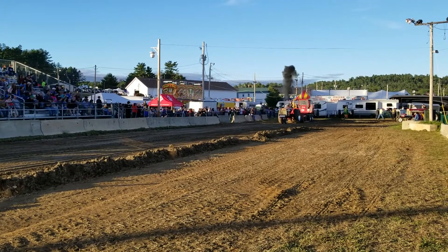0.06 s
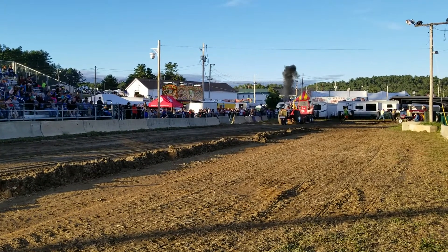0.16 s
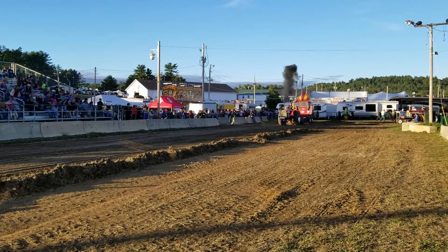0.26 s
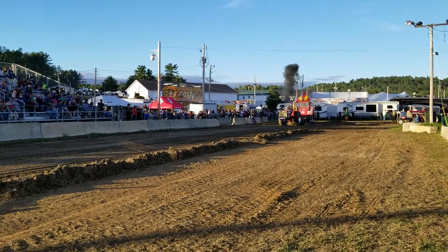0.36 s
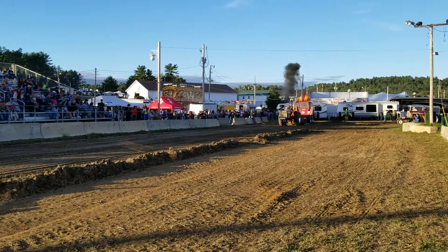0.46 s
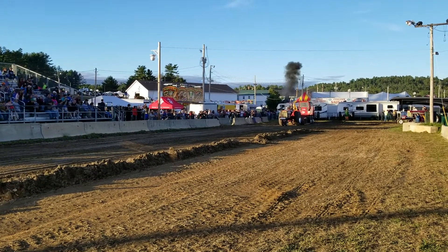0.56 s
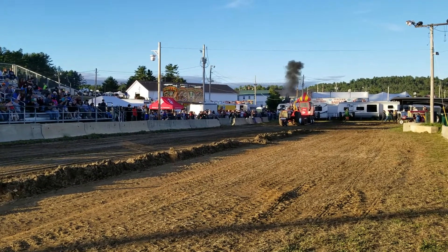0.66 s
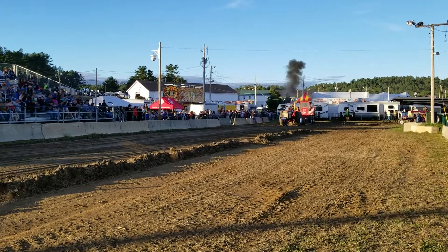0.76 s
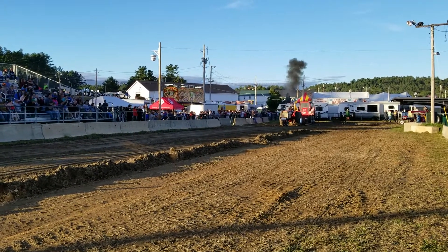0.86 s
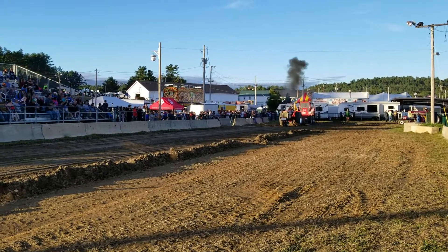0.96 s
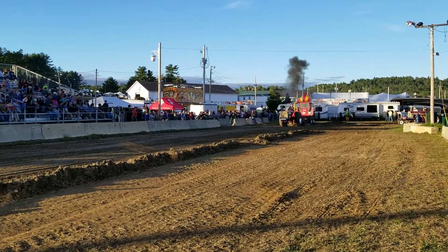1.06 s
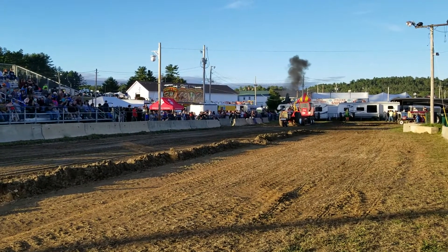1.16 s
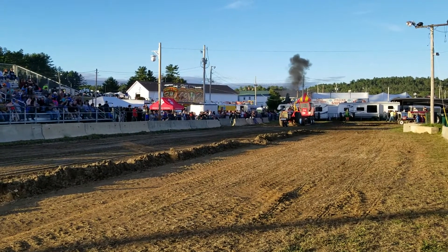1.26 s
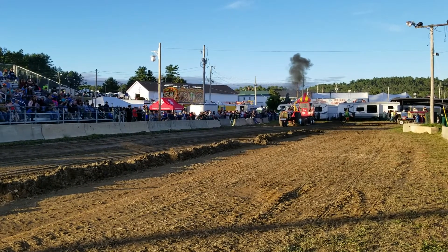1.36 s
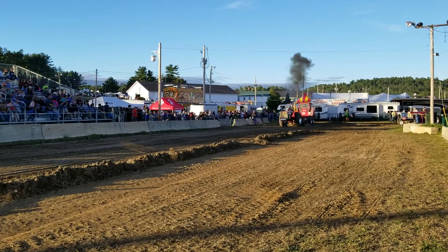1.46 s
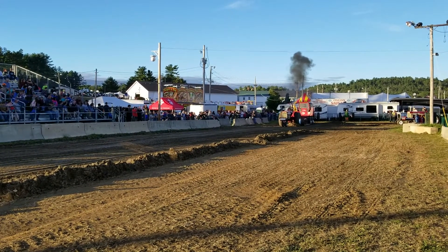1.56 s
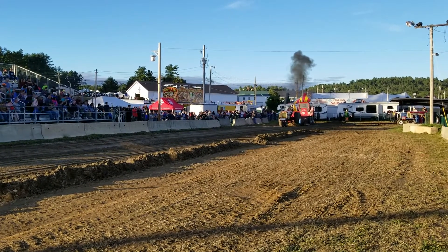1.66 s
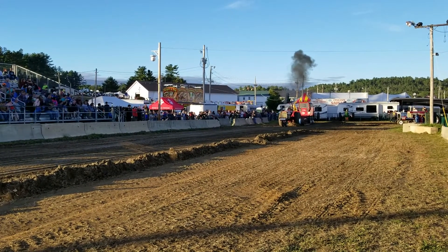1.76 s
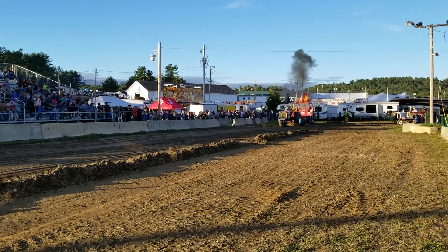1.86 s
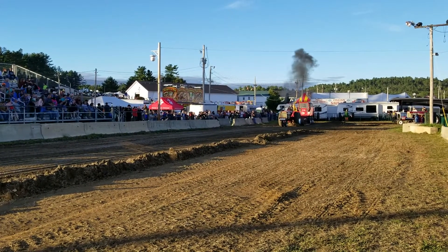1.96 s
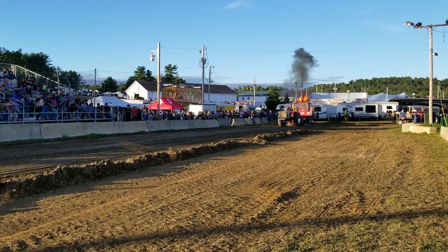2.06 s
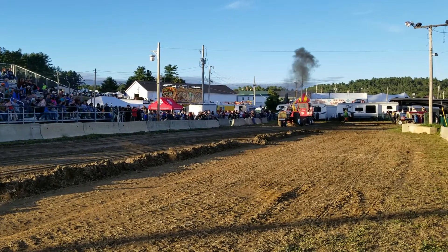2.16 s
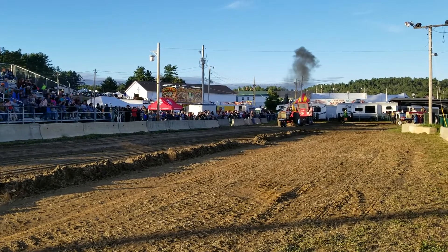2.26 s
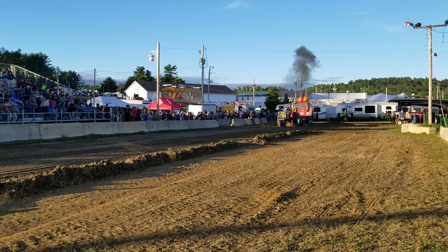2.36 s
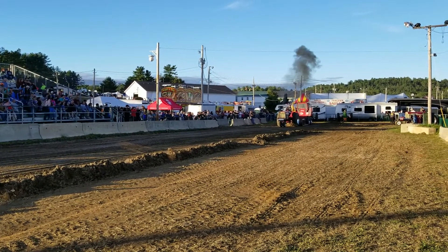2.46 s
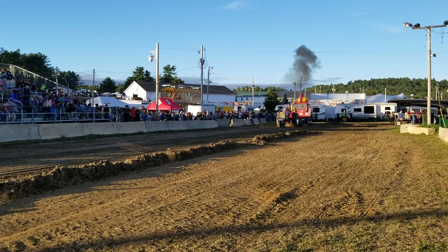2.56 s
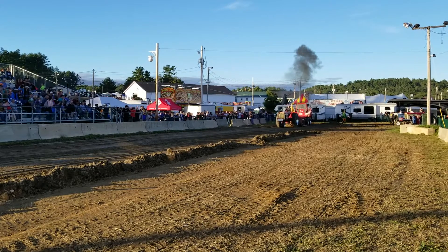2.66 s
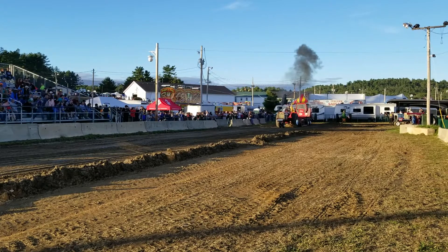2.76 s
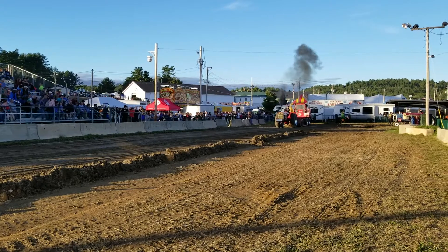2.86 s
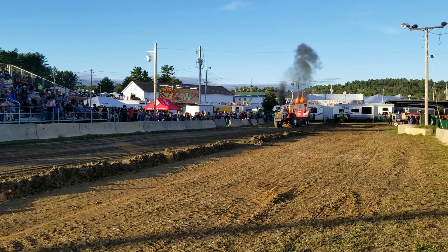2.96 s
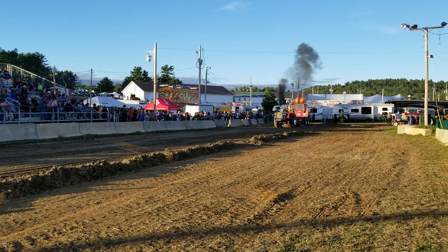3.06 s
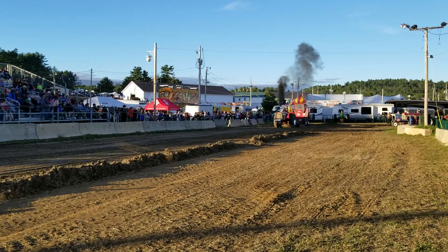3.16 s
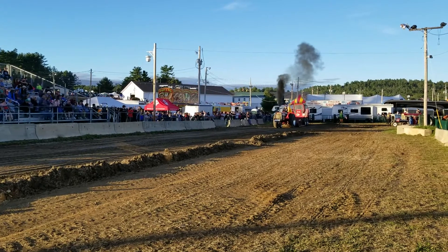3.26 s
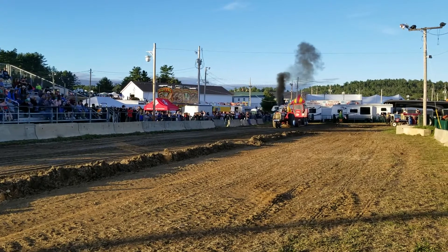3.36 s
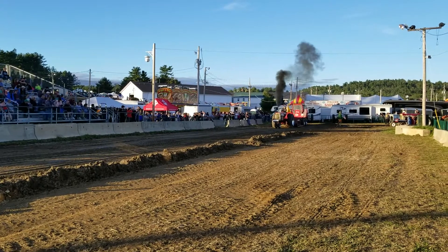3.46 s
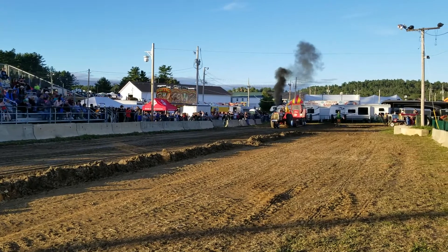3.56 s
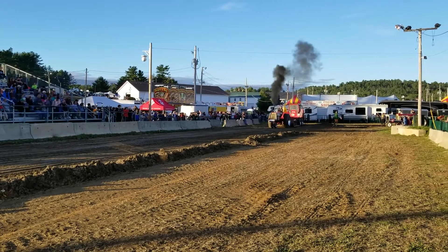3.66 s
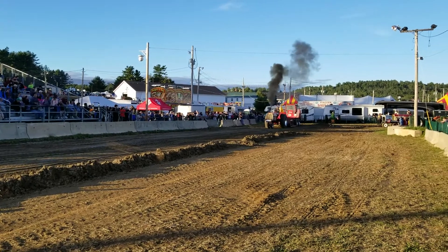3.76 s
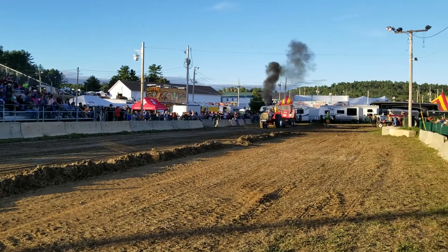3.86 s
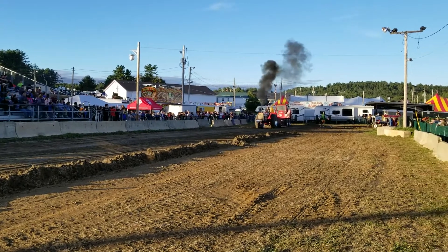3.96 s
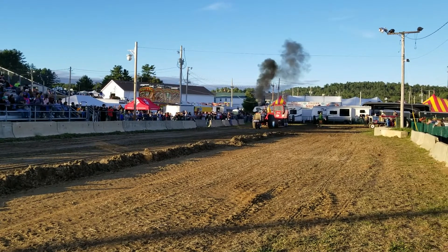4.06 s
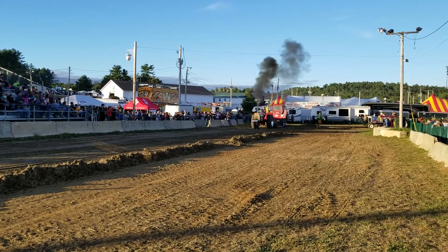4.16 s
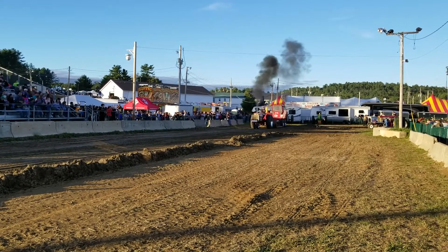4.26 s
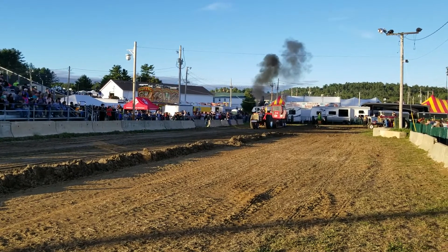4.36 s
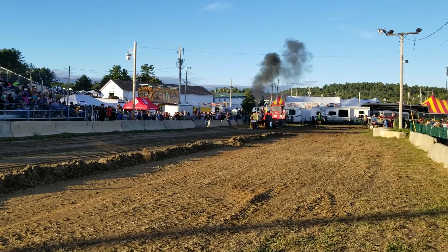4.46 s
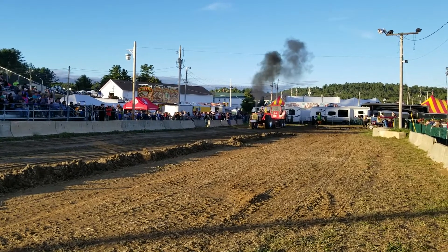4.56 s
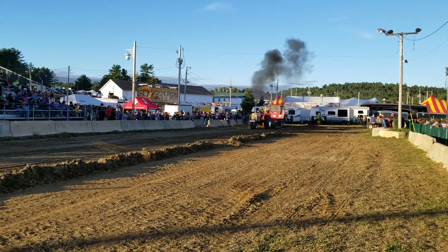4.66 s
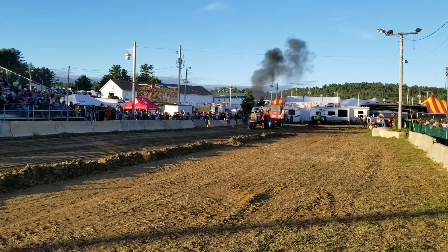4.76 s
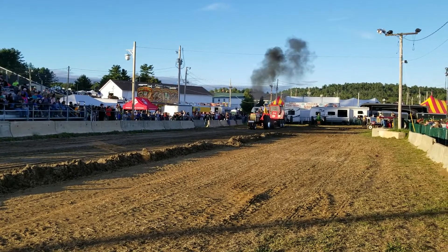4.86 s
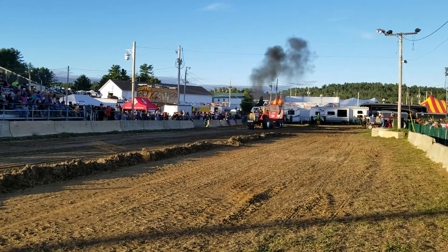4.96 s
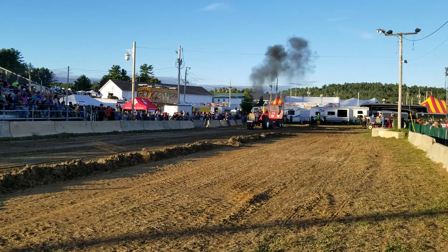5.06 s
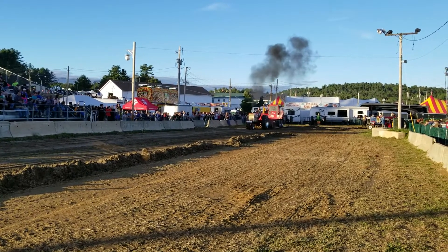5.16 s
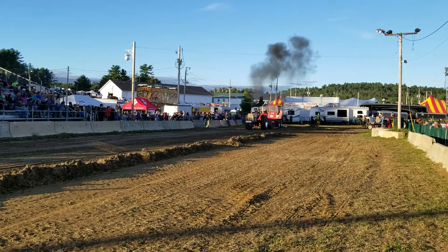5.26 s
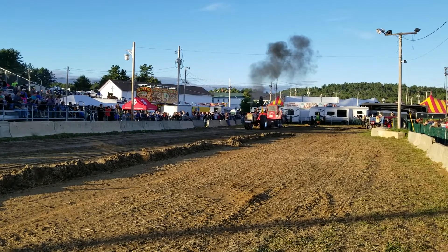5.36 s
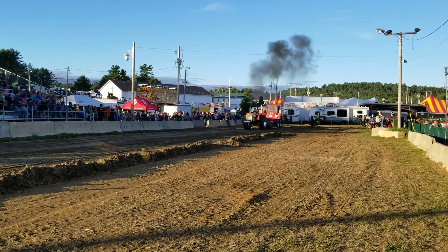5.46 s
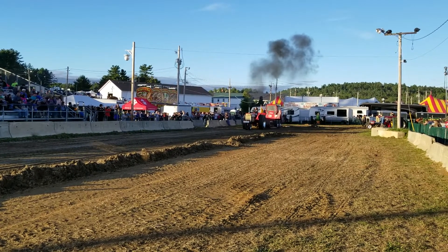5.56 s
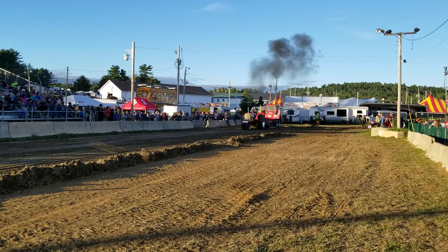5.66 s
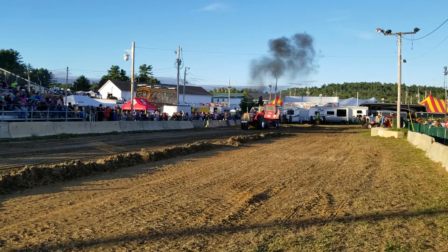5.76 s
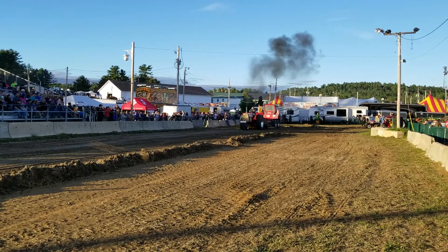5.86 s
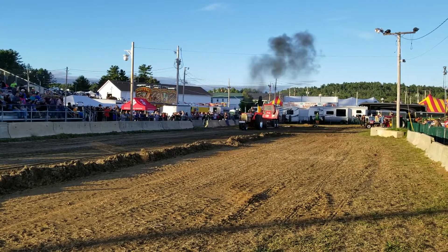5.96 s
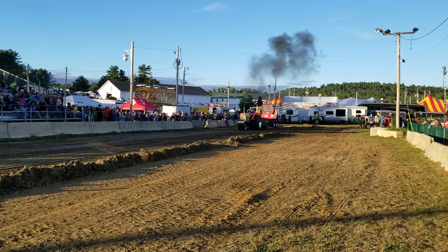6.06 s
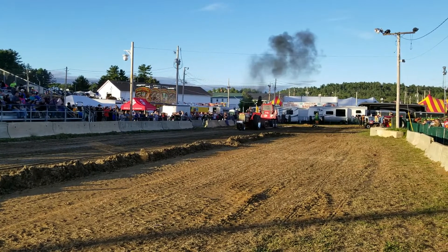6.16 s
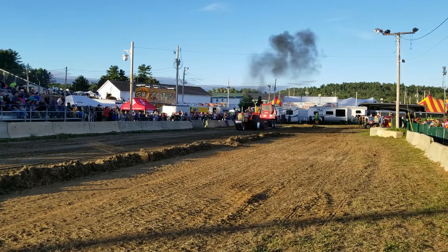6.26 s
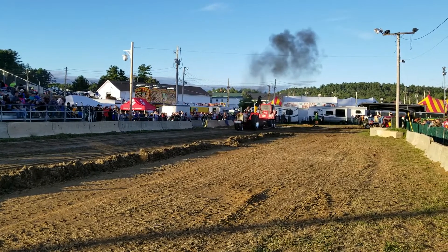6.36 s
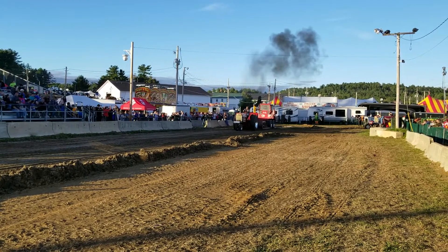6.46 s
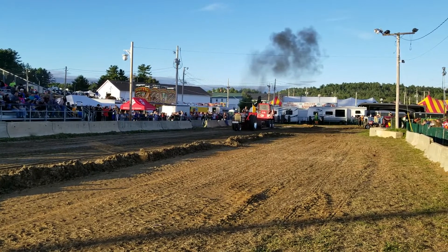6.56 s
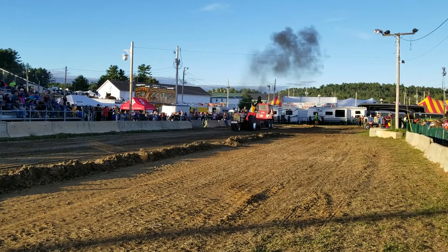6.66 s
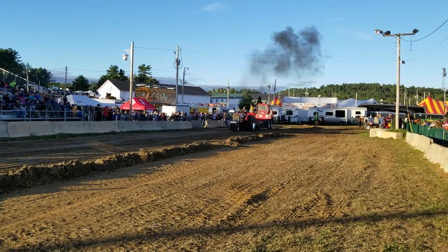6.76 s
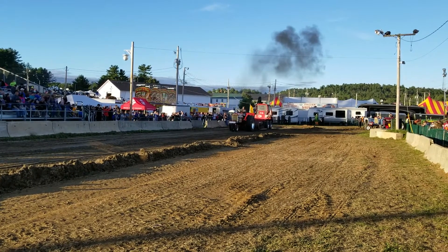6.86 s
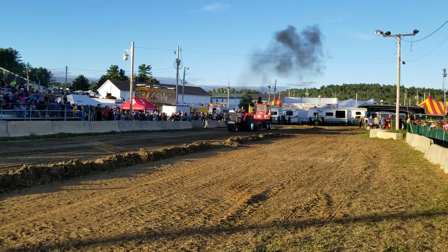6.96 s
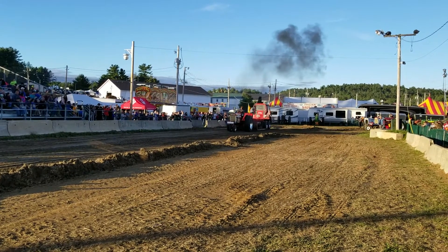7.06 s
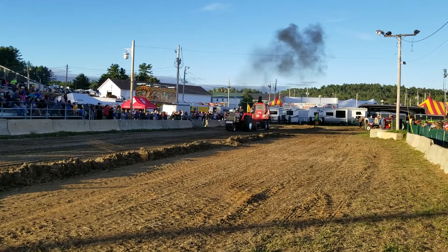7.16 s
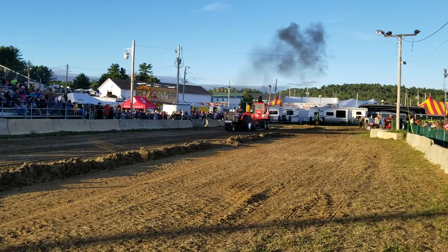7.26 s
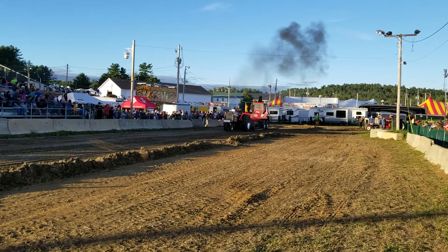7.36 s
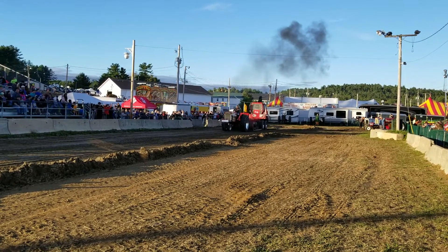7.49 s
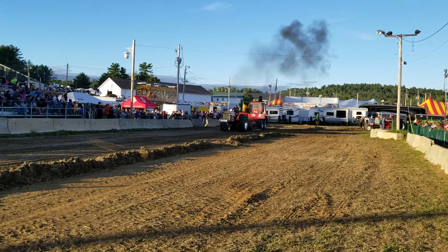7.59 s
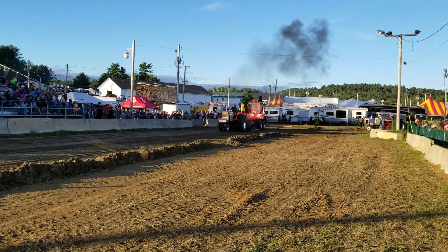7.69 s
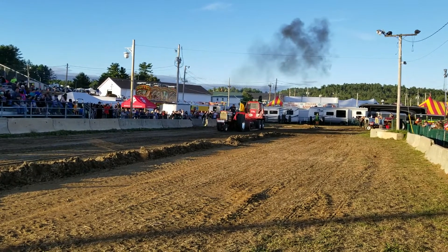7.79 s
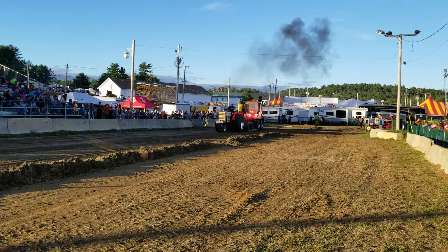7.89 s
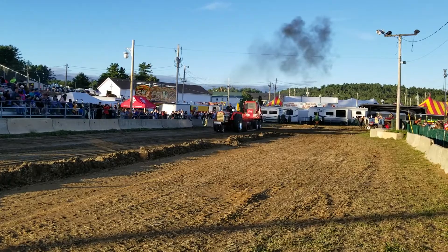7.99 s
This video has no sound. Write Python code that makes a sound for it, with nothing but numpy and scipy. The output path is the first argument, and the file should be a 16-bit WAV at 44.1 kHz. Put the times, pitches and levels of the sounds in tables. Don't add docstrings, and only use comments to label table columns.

```python
import sys
import numpy as np
from scipy import signal
from scipy.io import wavfile
from scipy.ndimage import uniform_filter1d, minimum_filter1d

SR = 44100
rng = np.random.default_rng(int(sys.argv[2]) if len(sys.argv) > 2 else 0)


def convert_level_to_amplitude(level_db):
    exponent = np.asarray(level_db, float) / 20
    return 10 ** exponent


def store_pcm(level_fs):
    pcm = np.round(np.clip(level_fs, -1, 1) * 32767).astype(np.int16)
    wavfile.write(sys.argv[1], SR, np.atleast_2d(pcm).T)


N = 354123
PULL_S = 2.7

# running light in dB, pulling in dB, shares of the flow, the bites and the sags.
BARK_LEVEL = (-30.5, -31, 0.9, 1.38, 0.09)
# time in seconds, hiss centre in Hz, intake centre in Hz.
BEARING = [(0, 4500, 11000), (2.6, 4470, 9950), (3, 4500, 11800), (4, 4600, 10400), (5, 4420, 11900),
           (7.2, 3840, 12040), (7.5, 5140, 12100), (8.03, 5400, 12400)]


def evened(x):
    return x / np.sqrt(np.mean(x ** 2) + 1e-20)


def read(points, hz):
    f, value = np.transpose(points)
    return np.interp(np.log(hz + 1), np.log(f + 1), value)


def curves(rows, t):
    s, *columns = np.transpose(rows)
    return [np.interp(t, s, c) for c in columns]


def ramp(t, start, length):
    return np.sin(np.pi / 2 * np.clip((t - start) / length, 0, 1)) ** 2


def dips(rows, t):
    return sum(db * np.exp(-((t - s) / width) ** 2) for s, db, width in rows)


def hump(hz, centre_hz, width_hz, db):
    return db / (1 + ((hz - centre_hz) / width_hz) ** 2)


def drift(top_hz, count):
    t = np.arange(0, N + 128, 128) / SR
    hz = np.geomspace(.3, top_hz, num=16)
    waves = np.sin(2 * np.pi * (hz[:, None] * t + rng.random((count, 16, 1))))
    slow = (waves / np.sqrt(hz)[:, None] ** .5).sum(1)
    return np.array([np.interp(np.arange(N) / SR, t, evened(row)) for row in slow])


def crank_speed(t):
    # time in seconds, engine cycles per second.
    speed = [(0, 26), (.2, 25.2), (1, 26.6), (1.4, 26.46), (1.7, 25.8), (2.2, 26.17), (2.7, 25.4),
             (3.4, 22.4), (3.8, 23.2), (4.15, 22.5), (4.4, 21.1), (4.65, 23.3), (5.05, 24.1), (5.75, 24.4),
             (6.2, 24.14), (6.42, 22.7), (7.85, 22.95), (8.03, 23.9)]
    hunt_from_s, period_s, hunt_cycles = 6.92, .45, .45
    onset = ramp(t, hunt_from_s - period_s / 2, period_s / 2)
    hunt = hunt_cycles * onset * np.cos(2 * np.pi * (t - hunt_from_s) / period_s)
    return uniform_filter1d(curves(speed, t)[0], size=4000) - hunt


def controls(t):
    # time in seconds, gas flow in dB.
    flow = [(0, -1.4), (.6, -1.5), (1.1, 1.2), (1.55, 2), (2.1, -0.5), (2.7, -0.5), (2.8, 5.5), (3.5, 1.7),
            (3.95, 2), (4.7, 3), (5.4, 5), (7.2, 4.5), (8.03, 5.5)]
    # peak in seconds, strength in dB, build-up in seconds.
    jolts = [
        (.04, 2.5, 0.017),
        (0.244, 5, 0.057),
        (.385, 2, 0.06),
        (.76, 0.5, 0.039),
        (1.755, 4.5, 0.12),
        (2.5, 1.5, 0.07),
        (2.645, 3, 0.034),
        (6.06, 1, 0.036),
        (7.49, 2, 0.032),
    ]
    # centre in seconds, depth in dB (below 0 swells), half width in seconds.
    sags = [(.11, 10, 0.066), (.38, 5, 0.054), (1.25, 5, 0.32), (1.6, -6, 0.25), (3.09, 3, 0.045),
            (3.72, 2.5, .06), (4.56, 2, 0.24), (4.76, 2.5, 0.041), (5.2, 6.5, 0.26), (5.7, 4, 0.083),
            (5.93, 0, 0.082), (6.27, 4.5, 0.16), (6.9, 3, 0.093), (7.12, 3.5, 0.14), (7.43, 7, 0.097),
            (7.68, 5, 0.079), (8.03, 2.5, 0.23)]
    let_go_s = 0.04
    bites = sum(db * np.exp(-((t - s) / np.where(t < s, rise, let_go_s)) ** 2) for s, db, rise in jolts)
    return ramp(t, PULL_S, 0.16), curves(flow, t)[0], bites, dips(sags, t)


def level_db(layer, pull, flow, bites, sags):
    light_db, heavy_db, by_flow, by_bite, by_sag = layer
    return light_db + (heavy_db - light_db) * pull + by_flow * flow + by_bite * bites + by_sag * sags


def orders(t, turns, load, drive):
    # order of the engine cycle, level in dB.
    light = [(1, -34), (2, -27), (3, -38), (4, -15), (5, -13.5), (6, -1), (7, -11), (8, -24.5), (9, 0),
             (10, -28), (11, -15.5), (12, -10), (13, -15), (14, -25.5), (15, -33), (16, -25)]
    # order of the engine cycle, level in dB.
    heavy = [(1, -44), (2, -42), (3, -29), (4, -7), (5, -10), (6, 0), (7, -14), (8, -18), (9, -8),
             (10, -20), (11, -12), (12, -5), (13, -21.5), (14, -9), (15, -13.5), (16, -3)]
    # centre in seconds, depth in dB, half width in seconds.
    octave_sags = [(.55, 9, .2), (2.25, 2, 0.19), (2.9, 4, 0.15), (3.45, 3.5, .08), (4.2, 1.5, 0.28),
                   (4.65, 7.5, 0.35), (5.1, 0.5, .05), (5.63, 4, .14), (6.2, 3.5, 0.25), (6.7, -4, 0.14),
                   (7.95, 5, 0.093)]
    # light in dB, pulling in dB, shares of the flow, the bites and the sags.
    firing = (-20.5, -5, -0.13, 1.83, -1)
    twice = (-29, -21.5, -0.11, .5, 0.03)
    half = (-23, -39, 0.85, -.5, .2)
    uneven = (-22, -32.5, .4, 0.5, 0.55)
    sway = drift(25., count=2)
    own = {6: level_db(firing, *drive),
           9: level_db(half, *drive) + 1.5 * load * sway[1],
           12: level_db(twice, *drive) - dips(octave_sags, t) + 1.57 * sway[0]}
    uneven_db = level_db(uneven, *drive)
    wander, slip = drift(14., count=16), drift(8.4, count=16)
    out = np.zeros((2, N))
    for k in range(1, 17):
        if k in own:
            order_db = own[k] + 1.25 * wander[k - 1]
            start = .05
        else:
            order_db = (1 - load) * light[k - 1][1] + load * heavy[k - 1][1] + uneven_db + 2.2 * wander[k - 1]
            start = 0.7 + rng.uniform(0, 4.55)
        phase = 2 * np.pi * k * turns + start * (1 + 0.023 * slip[k - 1])
        if k == 12:
            phase = phase - 1.2 * (1 + .3 * slip[0])
        apart = 0.0085 * k * (1 + 0.53 * slip[-k])
        balance = convert_level_to_amplitude([[0.0083 * k], [-.03 * k]])
        out += np.sqrt(2) * convert_level_to_amplitude(order_db) * np.cos([phase - apart, phase + apart]) * balance
    return out


def bark(turns, cycle_hz, load, drive):
    # centre in Hz, width in Hz, level in dB.
    pipe = [(410, 40, -9), (645, 42, 0), (790, 50, -7), (1100, 110, -14)]
    upper_db = [-13, 1, -5, -3, -6, 2, -5, -2, -2, -8, -10, -8, -11, -8]
    tuning_light = 0.98
    tuning_pull = 0.986 + .035 * (23.3 - cycle_hz)
    tuning = tuning_light + (tuning_pull - tuning_light) * drive[0]
    wander, slip = drift(3., count=36), drift(5., count=36)
    out = np.zeros((2, N))
    for k in range(17, 53):
        ring = sum(convert_level_to_amplitude(db) / (1 + ((k * cycle_hz[::64] - f * tuning[::64]) / w) ** 2) for f, w, db in pipe)
        ring = np.repeat(ring, 64)[:N] * convert_level_to_amplitude(-2.5 * (k % 2))
        light = convert_level_to_amplitude(upper_db[k - 17] - 6.5) if k <= 30 else 0.19 * ring
        level = (load * ring + (1 - load) * light) * convert_level_to_amplitude(2.5 * wander[k - 17])
        spread = np.pi * k ** 2 / 6
        phase = 2 * np.pi * k * turns + spread + rng.normal(0, .8) + .2 * slip[k - 17]
        out += level * np.cos([phase, phase + .5 * slip[16 - k] - .2])
    return convert_level_to_amplitude(level_db(BARK_LEVEL, *drive) - 0.5) * evened(out)


def noise(shape_db, patchy_db, flicker_db):
    # frequency in Hz, left-right likeness from 0 to 1.
    likeness = [(60, .995), (300, .98), (640, .86), (1400, .66), (3100, .72), (6800, .7), (15000, .8)]
    # frequency in Hz, left minus right in dB.
    lean_db = [(60, -.3), (200, .2), (380, 1.2), (700, 1.8), (1290, 2.6), (2380, 4.5), (4400, -5),
               (8120, -4), (15000, -2.5)]
    # frequency in Hz, radians by which left leads.
    far_phase = [(0, 0), (1120, -0.6), (1380, -1.0), (2410, -0.3), (3100, -1.0), (3360, -2.0), (4050, -2.3),
                 (5170, -1.0), (7060, -1.1), (8350, 0.1), (9730, -0.9), (12100, 1.2), (14400, 0.2),
                 (15200, 0.2)]
    # frequency in Hz, radians by which left leads.
    near_phase = [(0, 0), (950, -0.4), (2330, 0.2), (3450, -0.4), (3790, -1.3), (5680, 1.3), (6550, 0.3),
                  (7840, 2.0), (8180, -0.7), (9220, 2.6), (9560, 2.9), (10800, 3.0), (12100, 5.1),
                  (14000, 5.3), (15200, 4.2)]
    frames, hz = N // 256 + 5, np.fft.rfftfreq(1024, 1 / SR)
    t = np.arange(frames) * 256 / SR
    a, b, c, d, patches = rng.standard_normal((frames, 513, 5)).T
    patches = uniform_filter1d(patches, size=5, axis=0)
    patches = evened(uniform_filter1d(patches, size=40, axis=1))
    flicker = evened(uniform_filter1d(rng.standard_normal(frames), size=6))
    same = np.clip(read(likeness, hz), -1, 1)[:, None]
    near = np.clip(t / 7.05, 0, 1)
    lead = read(far_phase, hz)[:, None] * (1 - near) + read(near_phase, hz)[:, None] * near
    lean = convert_level_to_amplitude(read(lean_db, hz) / 2)[:, None]
    left = a + 1j * b
    right = same * left * np.exp(-1j * lead) + np.sqrt(1 - same ** 2) * (c + 1j * d)
    z = np.array([left * lean, right / lean])
    gain = convert_level_to_amplitude(shape_db(hz[:, None], t))
    gain = gain / np.sqrt((gain ** 2).mean(0)) * convert_level_to_amplitude(patchy_db * patches + flicker_db * flicker)
    return evened(signal.istft(z * gain, nperseg=1024, noverlap=768)[1][:, :N])


def puffs(turns, depth, late):
    fired = 6 * turns + late
    strength = convert_level_to_amplitude(3.7 * rng.standard_normal(6))[fired.astype(int) % 6]
    chance = convert_level_to_amplitude(1.0 * rng.standard_normal(int(fired[-1]) + 2))[fired.astype(int)]
    pulse = np.sin(np.pi * (fired % 1)) ** 4 * strength * chance
    return evened(1 + depth * pulse)


def ground_echo_db(hz, t):
    # time in seconds, delay in ms.
    echo = [(0, 1.48), (4, 1.5), (8.03, 1.54)]
    share = .4
    delay_s = curves(echo, t)[0] * 0.001003
    bounce = share / (1 + (hz / 3600) ** 6) * np.exp(-2j * np.pi * hz * delay_s)
    return 20 * np.log10(abs(1 - bounce))


def stack_hiss(turns, load, drive):
    # frequency in Hz, level in dB per Hz.
    spectrum = [(1650, -15), (2800, -19), (2940, -6.5), (3270, -2), (4450, -1), (5030, -4), (6120, -13.5),
                (7440, -12), (8490, -25), (9000, -51), (11700, -40), (19800, -120)]
    # running light in dB, pulling in dB, shares of the flow, the bites and the sags.
    layer = (-32, -32, 0.92, 1.32, -0.0351)

    def shape_db(hz, s):
        return read(spectrum, hz) + ground_echo_db(hz, s) + hump(hz, curves(BEARING, s)[0], 550, 3.5)

    hiss = noise(shape_db, 1.8, 0.2) * puffs(turns, 0.051 + 0.84 * load, 0.26)
    return convert_level_to_amplitude(level_db(layer, *drive) + 1.18) * hiss


def block_roar(turns, load, drive):
    # frequency in Hz, level in dB per Hz.
    spectrum = [(700, -60), (860, -4), (950, -12), (1120, -1), (1500, -6), (1900, -4.5), (2400, -7.5),
                (3000, -8.5), (3500, -30), (5000, -51)]
    # running light in dB, pulling in dB, shares of the flow, the bites and the sags.
    layer = (-30.5, -31.5, 0.77, 0.82, -0.08)

    def shape_db(hz, s):
        return read(spectrum, hz) + ground_echo_db(hz, s)

    roar = noise(shape_db, 1.0, 0.71) * puffs(turns, 0.46 * load, 0.24)
    return convert_level_to_amplitude(level_db(layer, *drive) - 0.05) * roar


def rumble(drive):
    # frequency in Hz, level in dB per Hz.
    spectrum = [(20, -40), (35, -15), (50, -10), (100, 0), (200, 0), (300, -4), (460, -14), (650, -7),
                (850, -13), (1000, -26), (1500, -90)]

    def shape_db(hz, s):
        duck_db = 12. * ramp(s, PULL_S, 1.5)
        return read(spectrum, hz) - duck_db / (1 + (hz / 70) ** 2)

    return noise(shape_db, 1.6, 0.45) * convert_level_to_amplitude(-31 + 0.6 * (level_db(BARK_LEVEL, *drive) + 32.5))


def intake_hiss(t, turns, load, drive):
    # frequency in Hz, level in dB per Hz.
    spectrum = [(4880, -33), (8300, -15), (8930, -5.5), (11700, 2.5), (12300, -1), (15600, -19)]
    # time in seconds, loss to the air at the very top in dB.
    air = [(0, 1), (2.3, 4), (4, -6.2), (8.03, -5)]
    # running light in dB, pulling in dB, shares of the flow, the bites and the sags.
    layer = (-51, -49, 0.97, 1.3, -0.08)

    def shape_db(hz, s):
        air_db = -curves(air, s)[0] * np.clip(hz / 15000 - .8, 0, 1) * 5
        return read(spectrum, hz) + air_db + hump(hz, curves(BEARING, s)[1], 980, 1.7)

    boost_db = 3 * ramp(t, 3.2, 1.2)
    hiss = noise(shape_db, 0.65, 0.85) * puffs(turns, 0.3 + 0.42 * load, 0.32)
    return convert_level_to_amplitude(level_db(layer, *drive) + boost_db + 3.5) * hiss


def turbo(t):
    # time in seconds, pitch in Hz, level in dB.
    whistle = [(5.8, 12100, -67), (6.3, 12080, -61), (6.85, 11840, -62), (7.03, 11600, -58),
               (7.25, 12100, -52), (7.4, 12030, -43.5), (7.8, 12000, -48), (8.03, 12200, -48)]
    hz, db = curves(whistle, t)
    fade = np.clip((t - whistle[0][0]) / .6, 0, 1)
    wobble, swell = drift(90., count=2)
    phase = 2 * np.pi * np.cumsum(uniform_filter1d(hz, size=4000) + 22. * wobble) / SR
    return fade * convert_level_to_amplitude(db + 4.5 + 2.5 * swell) * np.cos([phase, phase + 1.0])


def other_engine(t):
    # frequency in Hz, level in dB.
    lines = [(85, -43), (113, -31), (142, -33), (170, -34.5), (296, -43)]
    # time in seconds, level in dB.
    fade_db = [(0, -10.5), (.5, 2.5), (1.1, -5), (1.4, 3.5), (2.0, 5), (2.6, -3), (3.2, -7), (8.03, -18)]
    wander = drift(4.1, count=2 * len(lines))
    hum = np.zeros(N)
    for k, (hz, db) in enumerate(lines):
        phase = 2 * np.pi * hz * t + 1.6 * wander[-k - 1]
        hum += convert_level_to_amplitude(db + 1.6 * wander[k]) * np.cos(phase)
    return np.sqrt(2) * convert_level_to_amplitude(curves(fade_db, t)[0]) * hum


def scene():
    t = np.arange(N) / SR
    cycle_hz = crank_speed(t)
    turns = np.cumsum(cycle_hz) / SR
    drive = controls(t)
    pull, _, bites, _ = drive
    load_light, load_heavy, load_per_bite_db = 0.14, 0.58, .07
    load = np.clip(load_light + (load_heavy - load_light) * pull + load_per_bite_db * bites, 0, 1)
    tones = orders(t, turns, load, drive) + bark(turns, cycle_hz, load, drive)
    gas = stack_hiss(turns, load, drive) + block_roar(turns, load, drive) + rumble(drive)
    gas = gas + intake_hiss(t, turns, load, drive)
    return tones + gas + turbo(t) + other_engine(t)


def top_cut(x):
    return signal.sosfilt(signal.butter(12, 15700, fs=SR, output="sos"), x)


def record(dry):
    crest = -minimum_filter1d(-abs(dry).max(0), size=441)
    held = dry / uniform_filter1d(np.maximum(crest / .99, 1), size=441)
    return top_cut(held)


dry = scene()
out = record(dry)
store_pcm(out)
```